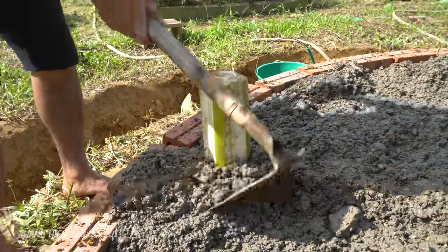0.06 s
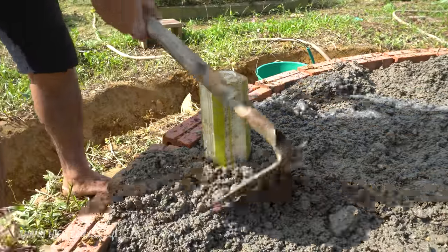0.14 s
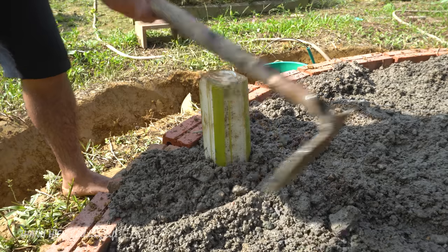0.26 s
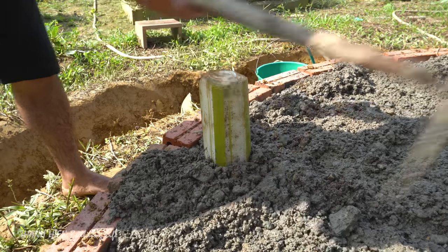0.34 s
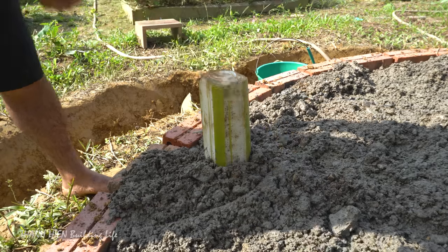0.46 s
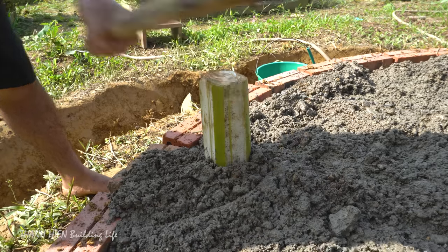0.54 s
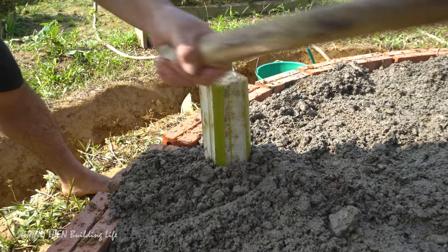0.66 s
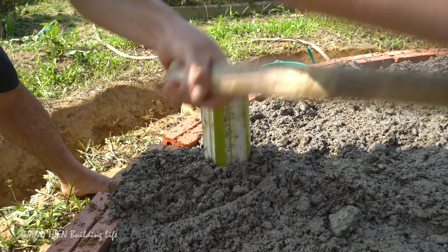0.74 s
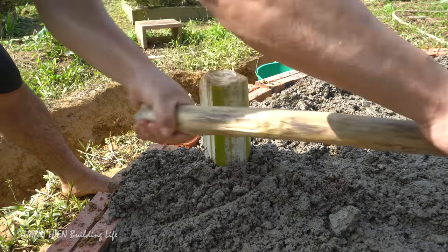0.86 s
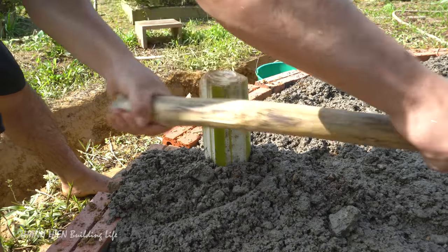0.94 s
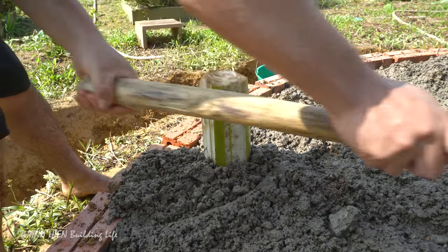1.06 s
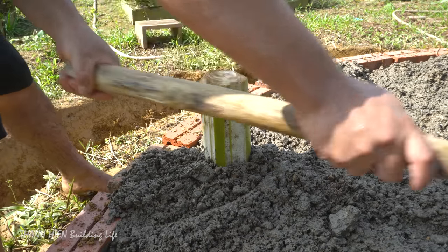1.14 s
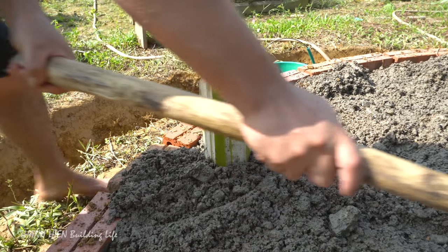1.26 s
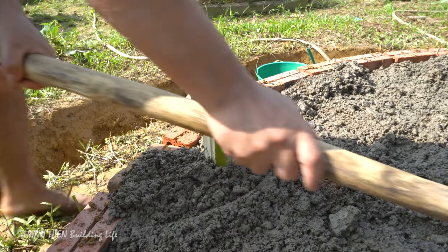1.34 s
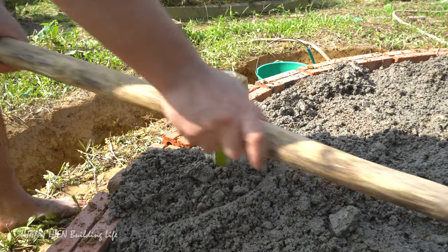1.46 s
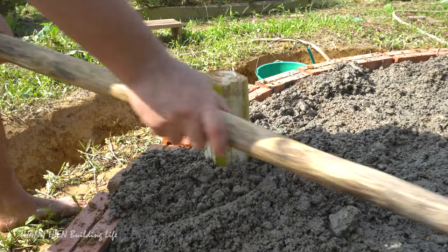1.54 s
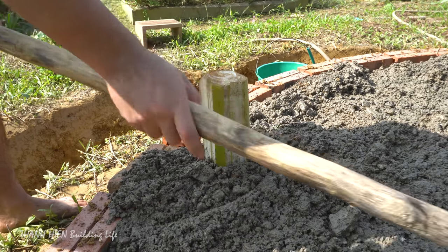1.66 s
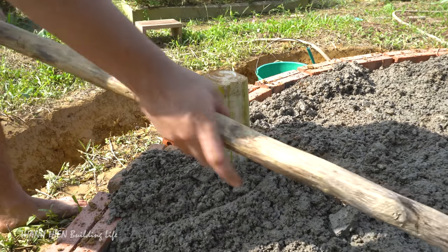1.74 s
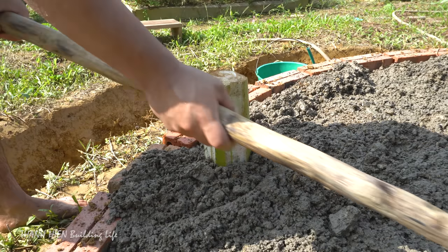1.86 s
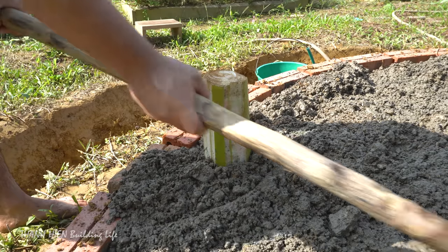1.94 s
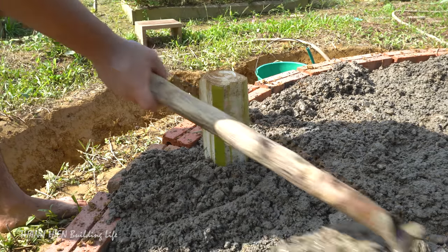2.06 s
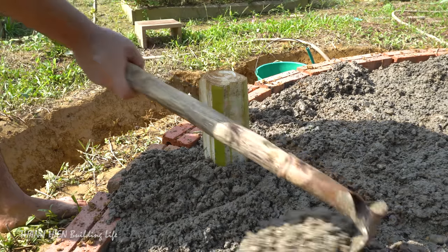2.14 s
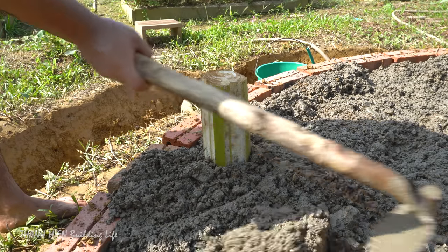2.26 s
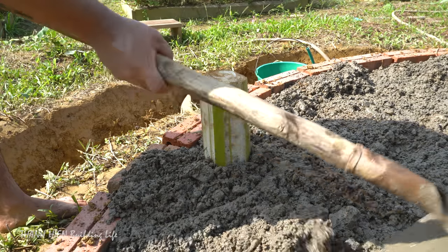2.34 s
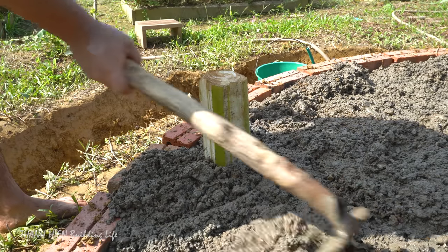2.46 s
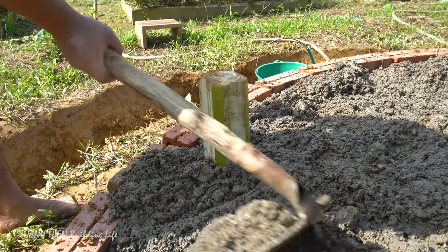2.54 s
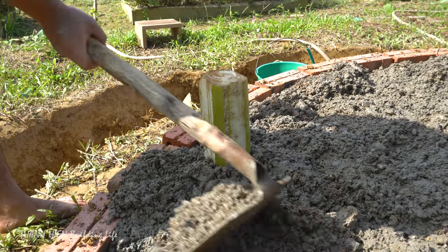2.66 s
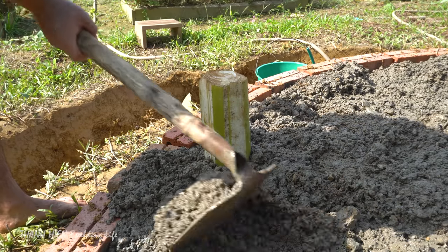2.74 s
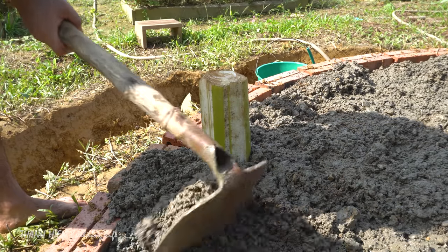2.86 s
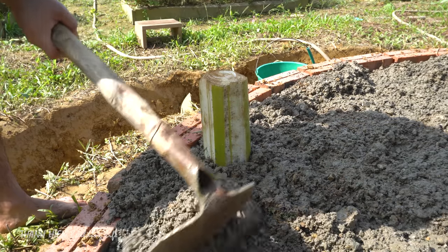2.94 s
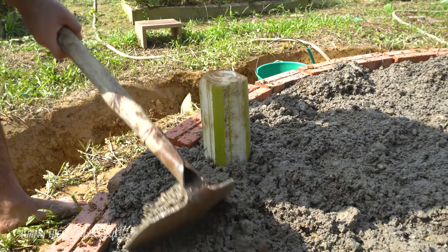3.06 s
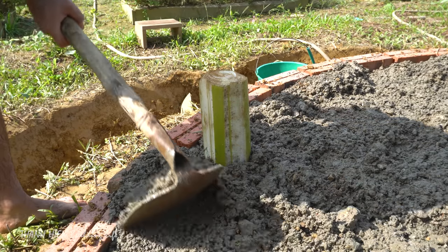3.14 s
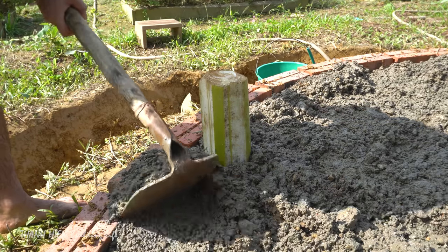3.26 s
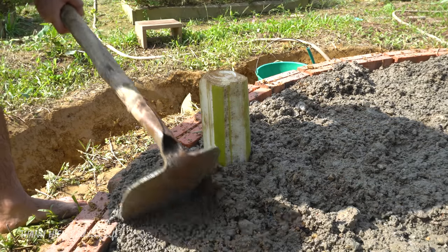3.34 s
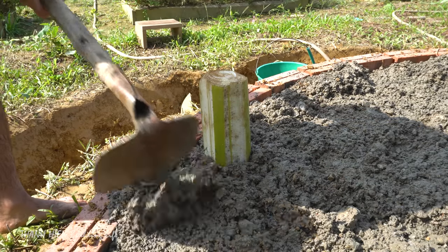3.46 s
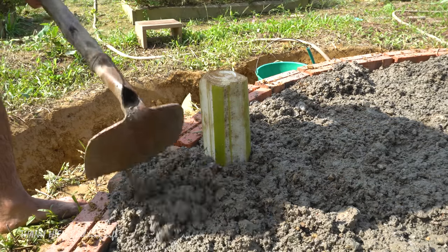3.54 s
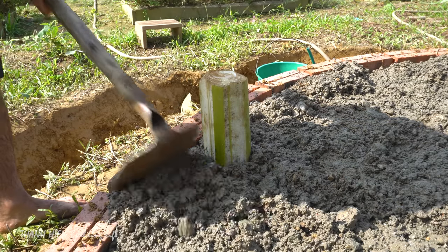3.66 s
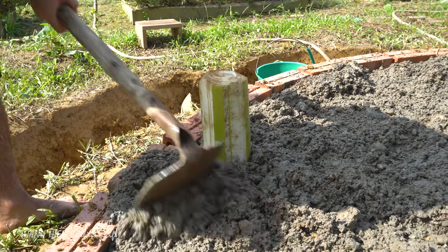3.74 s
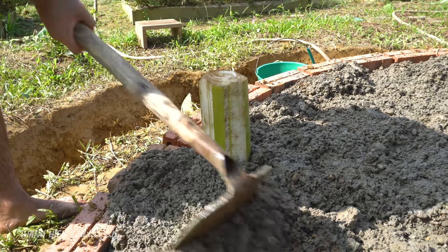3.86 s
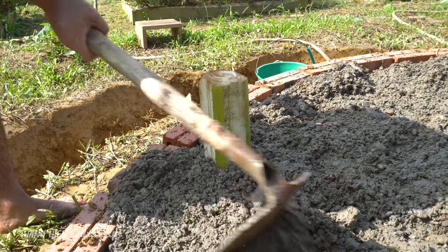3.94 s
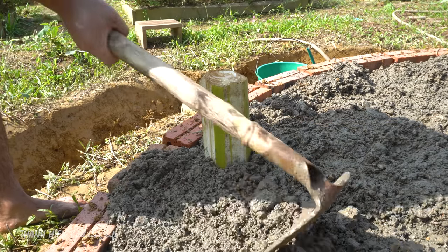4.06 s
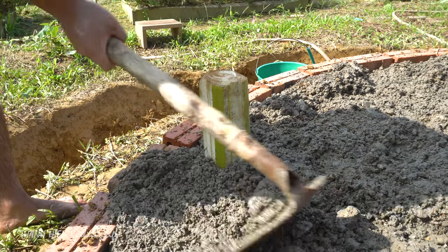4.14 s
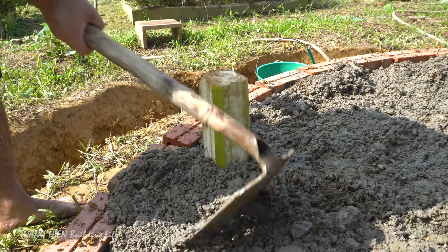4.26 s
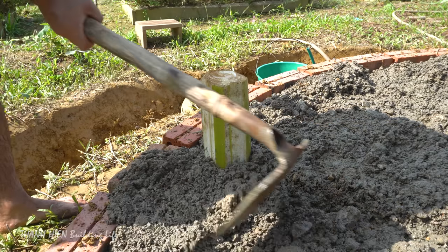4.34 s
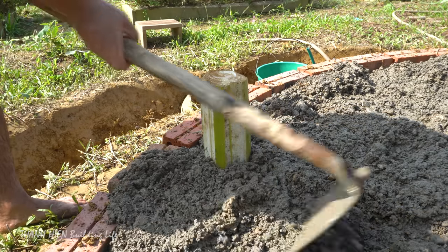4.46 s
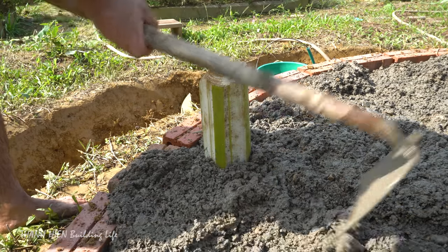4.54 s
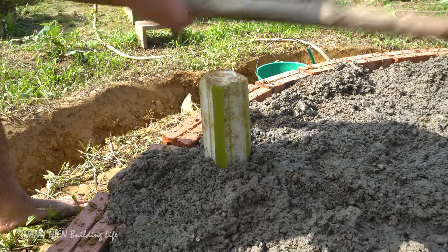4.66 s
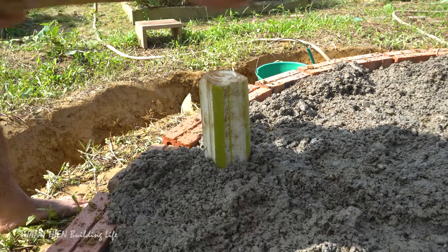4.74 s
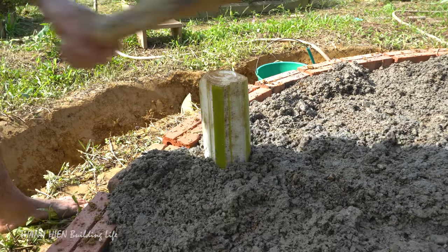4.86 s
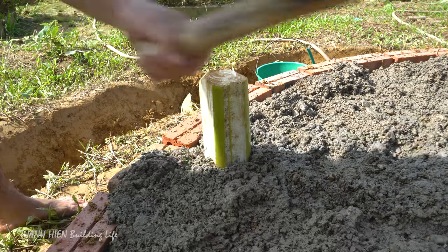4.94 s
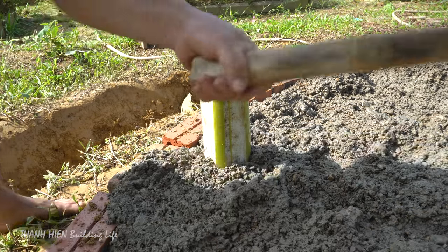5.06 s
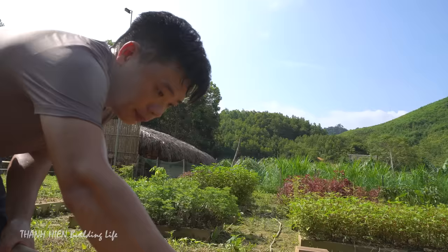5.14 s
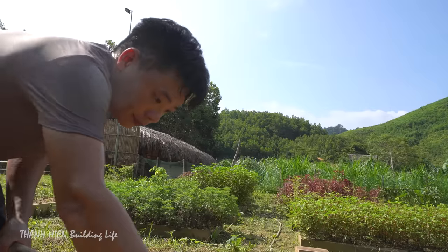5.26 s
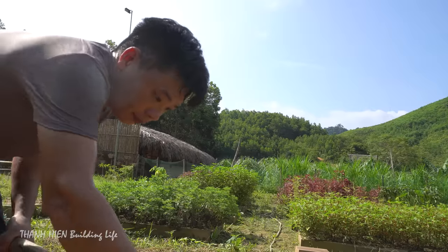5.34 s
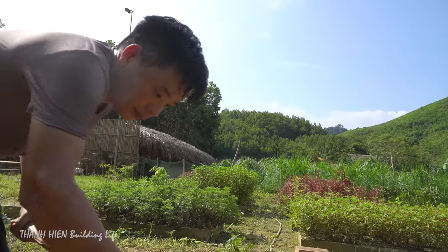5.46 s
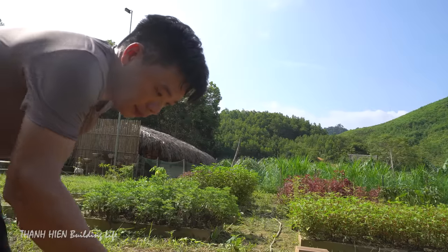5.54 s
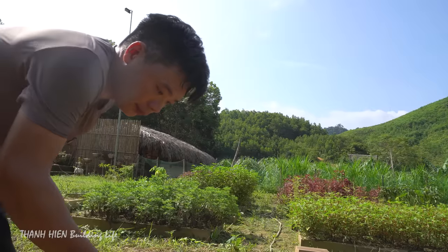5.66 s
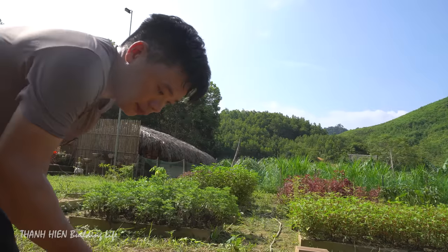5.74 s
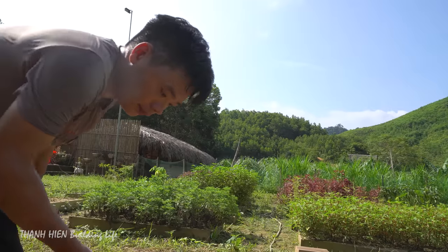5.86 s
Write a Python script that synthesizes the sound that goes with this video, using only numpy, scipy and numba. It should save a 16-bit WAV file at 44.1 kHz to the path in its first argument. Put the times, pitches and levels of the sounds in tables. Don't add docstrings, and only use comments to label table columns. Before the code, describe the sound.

A close stereo microphone outdoors hears a steel hoe working coarse, damp sand and cement. At 0.1 s comes a short bright crunch with stone clicks, gone by about 0.3 s. In the pause, palms rub the wooden handle, a distant cockerel crows and a faint bird whistles. At 0.8 s a hard chop starts a loud grinding drag until 1.45 s, the blade ringing metallically and stones cracking. Softer gritty sliding and lumps follow around 1.6 to 2.3 s. Another sharp bite lands at 2.5 s, trickling after it; a dense scrape runs 3.0 to 3.45 s, a chop falls at 3.75 s, and ringing scrapes come near 4.2 and 4.5 s. From 4.6 s only light ticks and hand slips remain until a violent chop at 5.16 s, then crumbly, thudding dragging to the end. Cicadas drone high throughout, over leaf noise, a low motor hum and breeze rumble.

```python
import sys
import numpy as np
from scipy import signal
from scipy.fft import rfft, irfft
from scipy.io import wavfile
from scipy.ndimage import uniform_filter1d, map_coordinates
from numba import njit

SR = 44100
rng = np.random.default_rng(int(sys.argv[2]) if len(sys.argv) > 2 else 0)


def store_pcm(level_fs):
    pcm = np.round(np.clip(level_fs, -1, 1) * 32767).astype(np.int16)
    wavfile.write(sys.argv[1], SR, np.atleast_2d(pcm).T)


def level_to_linear(level):
    exponent = np.asarray(level, float) / 20
    return 10 ** exponent


N = 259749

# start t/s, crunch level/dB, hold/s, release/(dB per
# s), deep grain level/dB
BITES = [(.1005, -22, .038, 1400, -12), (.110, -21, .002, 900, -12), (.125, -21, .003, 900, -12),
         (.144, -37, .01, 300, -14), (.170, -33, .013, 1200, -12), (.186, -38, .006, 700, -12),
         (.198, -46.5, .036, 800, -22), (.808, -16, .026, 380, -10), (.872, -21, .05, 400, -16),
         (1.163, -20, .03, 300, -2), (1.286, -23, .035, 90, 0), (1.398, -27, .022, 500, -14),
         (2.505, -18.5, .01, 200, -7), (2.983, -33, .03, 300, -30), (3.756, -21.5, .15, 95, -11),
         (4.29, -42, .03, 70, -25), (4.502, -20.5, .034, 300, -34), (4.552, -27, .012, 2000, -30),
         (4.6, -48.5, .06, 80, -35), (5.1585, -15.5, .011, 700, -13), (5.24, -35, .005, 300, -10)]
# peak t/s, level/dB, 10 dB rise/s, 10 dB fall/s, deep grain level/dB
DRAGS = [(.985, -26, .05, .03, -8), (.945, -28, .03, .02, -6), (1.008, -19.5, .018, .04, -14),
         (1.042, -19, .03, .016, -14), (1.085, -19, .022, .04, -15), (1.122, -19.5, .04, .03, -15),
         (1.148, -19.5, .02, .014, -15), (2.53, -19, .012, .025, -7), (2.555, -18.5, .015, .03, -7),
         (2.577, -23, .015, .015, -7), (1.23, -25.5, .04, .17, 2), (1.66, -29, .4, .15, -8),
         (2.08, -26, .21, .17, 3), (2.23, -29.5, .06, .09, -4), (2.38, -37, .08, .1, -30),
         (2.64, -25, .06, .18, 5), (2.9, -29.5, .15, .04, -8), (2.95, -37, .05, .07, -20),
         (3.082, -20, .035, .015, -13), (3.113, -19, .025, .03, -13), (3.146, -17.5, .014, .012, -6),
         (3.17, -26, .03, .06, -6), (3.222, -20.5, .022, .055, -2), (3.41, -23, .062, .062, 2),
         (3.6, -37.5, .16, .11, -45), (3.743, -24, .008, .02, 0), (3.756, -16, .01, .014, -15),
         (4.08, -34, .12, .07, -25), (4.234, -17, .03, .04, -45), (5.195, -19.5, .02, .004, -9),
         (5.31, -29.5, .2, .15, 4), (5.43, -33, .06, .06, 14), (5.54, -31.5, .09, .13, 4),
         (5.66, -32, .09, .07, 8), (5.76, -32.5, .05, .06, 8), (5.86, -30.5, .1, .2, 4)]
# from t/s, to t/s
LIFTED = [
    (.3, .808),
    (4.72, 5.158),
]
# t/s, left port delay/us, fine grain level/dB
BLADE_PATH = [(.1, 6.9, -8), (.13, 6.9, -9.5), (.185, 11, -15), (.84, 51.3, -7), (.875, 50, -17),
              (.91, 49, -11), (.95, 48, -11), (1.14, 46, -7), (1.17, 46, -14), (1.2, 45, -9),
              (1.29, 44, -14), (1.33, 43, -10), (1.9, 30, -9.5), (2.3, 7, -7.5), (2.55, 15, -7),
              (2.8, 3.7, -10.5), (3.1, 1.6, -4), (3.27, 1.6, -10), (3.68, 1.7, -5), (3.95, 5, -9),
              (4.18, 11, -4), (4.5, 18, -7), (5.15, 65, -7.5), (5.25, 18, -10), (5.5, 8, -5.5),
              (5.8, 1, -6)]
# f/Hz, density level/dB per Hz
GRIT_COLOUR = [(71, -56), (120, -43), (418, -38), (712, -11.5), (1090, -3.5), (1340, -3.5), (1620, -3),
               (2640, -1.5), (8480, -5), (13300, -16.5), (16000, -35)]
# from t/s, to t/s, f/Hz, width/Hz, level/dB
BLADE_RINGS = [(.1, .15, 1950, 250, 2), (.15, 0.254, 1950, 200, 8.5), (0.796, 1.234, 1324, 120, 4),
               (.8, 1.165, 1990, 150, -3.5), (.9, 1.298, 2560, 100, -4), (.98, 1.16, 720, 80, 1),
               (1.25, 1.436, 1380, 100, -0.5), (2.49, 2.564, 2500, 150, 0), (3.035, 3.235, 1950, 250, -8),
               (3.74, 3.946, 2440, 250, -22), (2.896, 2.93, 2250, 200, 4), (2.984, 3.025, 2370, 100, 10),
               (4.575, 4.61, 3600, 120, 8), (1.24, 1.32, 2400, 150, 2), (3.974, 4.155, 950, 40, 8),
               (4.17, 4.29, 936, 45, 10.5), (4.572, 4.603, 950, 90, 2), (4.574, 4.605, 1470, 80, 10),
               (4.51, 4.525, 1900, 300, 3), (5.238, 5.275, 1230, 120, 1), (5.15, 5.21, 1900, 120, -6),
               (5.15, 5.21, 3080, 200, -11), (5.65, 5.774, 780, 100, -18)]
# t/s, peak level/dB, ring f/Hz, ring t60/s, crack level/dB
STONES = [(0.111, 10, 1800, 0.015, -18), (0.128, 6, 3000, 0.015, -16), (0.234, -17, 2470, 0.06, -30),
          (0.81, -24, 1270, 0.012, -17), (1.045, 2, 1350, 0.02, -12), (1.197, 4, 1280, 0.022, -17),
          (2.553, -24, 1360, 0.015, -12), (3.094, -2, 1930, 0.015, -9), (3.142, -6.5, 1970, 0.018, 0.5),
          (3.257, -14, 3320, 0.015, -16), (3.405, 1, 1850, 0.018, -13), (3.751, -6, 2150, 0.039, -20),
          (4.182, -17, 910, 0.015, -8), (4.229, -15, 4500, 0.017, -21), (4.249, 8, 4060, 0.015, -23),
          (4.519, 7, 930, .025, -40), (4.52, 2, 580, .05, -40), (4.564, -6, 950, .03, -30),
          (4.564, -5, 1490, .03, -30), (4.717, -24, 990, 0.05, -40), (5.162, 9, 2980, 0.017, -18),
          (5.172, -0.5, 3100, 0.022, -15), (5.192, -5, 1300, 0.015, -7), (5.264, -8, 1230, 0.024, -12),
          (5.669, -12, 743, 0.015, -14)]
# t/s, peak level/dB, ring f/Hz, brightness level/dB
TICKS = [(.1118, -2, 2760, -24), (0.183, -2, 1890, -30), (0.6245, -32, 2900, -14), (1.867, -20, 3590, -16),
         (3.614, -21, 2630, -16), (0.8733, 2.5, 1700, -24), (0.9615, 2.5, 2640, -20),
         (0.964, -6, 2200, -24), (1.4205, -8, 2900, -24), (2.5062, 3, 2330, -9), (2.625, -8, 1900, -17),
         (2.664, -17, 9500, -10), (2.9072, -6, 2200, -22), (2.912, -13, 2150, -28),
         (2.9865, -16, 2370, -14), (3.0406, 4, 2330, -5), (3.1755, -8, 1890, -14), (3.609, -14, 2900, -11),
         (3.93, -6, 3940, -16), (4.142, -17, 5000, -16), (4.1515, -8, 3540, -14), (4.439, -33, 4730, -13),
         (4.505, -8, 2390, -15), (4.5205, 1, 926, -18), (5.074, -33, 4770, -13), (5.091, -32, 4620, -14),
         (4.1545, -15, 3540, -14), (3.0955, -3, 2900, -16), (3.301, -21, 3000, -14),
         (1.0465, -6, 3000, -14)]
# t/s, peak level/dB, f/Hz
ROLLING_STONES = [(0.109, -12, 1870), (0.11, -19, 1060), (0.111, -13, 2760), (0.114, -14, 3550),
                  (0.126, -12, 1920), (0.127, -15, 3360), (0.822, -13, 1270), (0.903, -16, 1340),
                  (0.913, -21, 4670), (0.919, -17, 1310), (1.079, -20, 4520), (1.083, -16, 2690),
                  (1.096, -13, 1380), (1.124, -17, 1340), (1.129, -19, 3550), (1.139, -15, 1250),
                  (1.266, -20, 2370), (1.306, -21, 2480), (1.312, -19, 1440), (1.344, -21, 1790),
                  (1.377, -22, 1460), (2.517, -19, 860), (2.517, -16, 4690), (2.624, -21, 3060),
                  (2.996, -25, 2370), (3.075, -20, 1980), (3.08, -17, 4950), (3.096, -15, 1920),
                  (3.113, -19, 1870), (3.212, -21, 900), (3.402, -20, 1830), (3.403, -22, 3010),
                  (3.403, -21, 2220), (3.751, -18, 3060), (3.752, -15, 3550), (3.754, -18, 4330),
                  (3.754, -13, 2200), (3.825, -19, 3510), (4.024, -29, 1030), (4.088, -30, 2820),
                  (4.198, -30, 930), (4.231, -21, 1870), (4.232, -18, 3550), (4.265, -21, 930),
                  (4.504, -20, 3040), (4.504, -19, 3940), (4.505, -21, 1420), (4.505, -20, 5000),
                  (4.505, -12, 2390), (4.535, -17, 880), (4.535, -17, 4390), (4.54, -18, 1460),
                  (5.164, -16, 2670), (5.169, -16, 1060), (5.17, -13, 3120), (5.171, -13, 1890),
                  (5.19, -19, 1890), (5.191, -18, 1270), (5.264, -23, 1230), (5.512, -27, 1250)]
# t/s, peak
# level/dB, f/Hz
WET_LUMPS = [(0.113, -21, 580), (0.373, -54, 450), (1.007, -21, 710), (1.073, -25, 730), (1.248, -31, 540),
             (1.305, -27, 520), (2.041, -28, 750), (2.087, -27, 780), (2.196, -34, 470), (2.635, -26, 800),
             (2.737, -31, 820), (3.395, -26, 780), (3.738, -28, 470), (3.86, -30, 390), (4.021, -41, 470),
             (4.117, -44, 540), (4.777, -48, 540), (4.963, -45, 520), (5.019, -51, 520), (5.082, -51, 560),
             (5.387, -34, 300), (5.416, -33, 540), (5.66, -30, 800), (5.75, -34, 800), (5.811, -38, 820),
             (5.881, -37, 450), (.186, -34, 1756), (.874, -23, 1326), (2.908, -28, 2184),
             (2.908, -32, 2376), (2.99, -29, 2380), (4.437, -46, 900), (4.716, -49, 1250),
             (4.826, -52, 710), (5.04, -48, 1410)]
# t/s, peak level/dB
JOLTS = [
    (.812, -40),
    (2.506, -35),
    (3.75, -46),
    (5.162, -35),
]
# t/s, peak level/dB, f/Hz
THUDS = [(.812, -38, 150), (2.1, -36, 280), (2.105, -36, 400), (2.15, -42, 115), (2.02, -42, 310),
         (3.4, -40, 170), (3.75, -33, 230), (5.165, -32, 190), (5.3, -36, 260), (5.36, -33, 330),
         (5.43, -36, 220), (5.5, -34, 300), (5.58, -36, 240), (1.31, -33, 280)]
# from t/s, to t/s, low mode level/dB, upper mode level/dB, rustle level/dB
PALM_SLIPS = [
    (.38, .55, -63, -67, -60),
    (.5, .62, -72, -68, -56),
    (.62, .72, -62, -64, -55),
    (.72, .8, -64, -61, -57),
    (4.62, 4.76, -78, -74, -54),
    (4.77, 4.8, -70, -58, -52),
    (4.8, 4.95, -66, -61, -47),
    (4.95, 5.0, -55, -53, -47),
    (5.0, 5.08, -57, -52, -50),
    (5.08, 5.13, -59, -66, -53),
]
# f/Hz, width/Hz
HANDLE = [
    (530, 50),
    (1400, 80),
    (2700, 5300),
]
# f/Hz, width/Hz
GROUND = (124, 31)
# f/Hz, width/Hz, level/dB, tymbal clicks/(1 per s)
CICADAS = [
    (4850, 500, -54.5, 250),
    (5450, 300, -63, 290),
    (7360, 550, -60, 180),
]
# from t/s, to t/s, levels of partials 1, 2, 3/dB
CROW = [
    (-.05, .09, -67, -64, -68),
    (.27, .47, -74, -63, -77),
    (.45, .62, -63, -70, -76),
    (.64, .72, -64, -62, -63),
    (.72, .81, -64, -57, -60),
]
# from t/s, to t/s, from f/Hz, to f/Hz, level/dB
BIRD = [
    (.47, .65, 2950, 3500, -55),
    (.52, .565, 3800, 2900, -54),
]
# f/Hz, density level/dB per Hz
FIELD_COLOUR = [(59, -34), (100, -17), (302, -8), (524, -11), (634, -7), (1280, -10), (1360, -17),
                (1610, -9.5), (4110, -11.5), (5300, -4.5), (6290, -16.5), (9020, -14.5), (16000, -20)]
# f/Hz, likeness/(0 to 1)
FIELD_ALIKE = [(60, 0.42), (300, .8), (1400, 0.88), (3100, 0.25), (6800, 0.11), (15000, 0.18)]
# f/Hz, width/Hz, level/dB
FAR_MOTOR = (118, 15, -75)
# peak t/s, 10 dB change/s, breeze level/dB, rumble level/dB
GUSTS = [(.85, .05, -53, -54), (1.0, .08, -53, -56), (1.13, .08, -50, -54), (1.36, .1, -56, -55),
         (1.7, .2, -60, -58), (1.9, .1, -58, -66), (2.14, .08, -51, -50), (2.53, .1, -60, -60),
         (2.72, .1, -66, -57), (3.15, .1, -67, -63), (3.82, .1, -60, -64), (4.1, .2, -56, -62),
         (4.28, .1, -55, -62), (4.6, .09, -55, -68), (5.2, .1, -60, -55), (5.42, .25, -55, -57),
         (5.65, .2, -55, -55)]


def hoe():
    t = np.arange(N) / SR
    hits = crunch() + stones()
    out = hits + ticks()
    for t0, t1, hz, width, db in BLADE_RINGS:
        out += level_to_linear(db) * mode(hits * ((t > t0) & (t < t1)), hz, width)
    tail_t = np.arange(4000) / SR
    tail = rng.standard_normal((2, 4000)) * level_to_linear(-60 * tail_t / 0.04)
    out += level_to_linear(-43) * signal.fftconvolve(out, tail, axes=1)[:, :N]
    return high_pass(out, 3, 310)


def crunch(grains=90000, cycles=19.2, scatter_db=1.5, slip_db=1.1, clump_db=1.8, clumps_per_s=45, edge_us=10):
    draw, odd = rng.random((grains, 3)).T, rng.standard_normal(grains)
    s = draw[0] * N / SR
    hz = (12 + 114 * draw[1]) ** 2
    t60 = cycles / hz
    size = level_to_linear(on_log(GRIT_COLOUR, hz) - scatter_db * np.log(draw[2])) * hz ** (3 / 4)
    mid = (hz > 1000) & (hz < 4500)
    steady = pings(s[mid] * SR, 0 * s[mid], hz[mid], t60[mid], size[mid], N)
    size = size / np.sqrt(np.mean(steady ** 2))

    level_db, deep_db, fine_db = work(s)
    deep = np.clip(np.log2(1300 / hz) / 1.6, 0, 1.6)
    fine = np.clip(np.log2(hz / 3500), 0, 1.4)
    gain = level_to_linear(level_db + deep * (deep_db + 16) + fine * (fine_db + 5.5))
    for t0, t1 in LIFTED:
        gain = gain * ((s < t0) | (s > t1))

    slip = level_to_linear(slip_db * walk(120)[(s * SR).astype(int)])
    clumps = rng.standard_normal((int(N / SR * clumps_per_s) + 2, 16))
    patch = map_coordinates(clumps, [s * clumps_per_s, 2 * np.log2(hz / 140)], order=1)
    slip = slip * level_to_linear(clump_db * patch - 0.1)
    lag = lag_at(s) + edge_us * 1e-6 * SR * odd[::-1]
    return pings(s * SR + 4, lag, hz, t60, size * gain * slip * np.sign(odd), N)


def work(s, bite_s=.004, bite_db=36, spray_db=9, spray_s=.025, trickle_fine=.12):
    t = np.arange(0, N / SR + .002, .001)
    parts = []
    for at, db, rise, fall, deep_db in DRAGS:
        parts.append((db + swell(t, at, rise, fall), deep_db, 0 * t))
    for at, db, hold, release, deep_db in BITES:
        attack_db = np.minimum(bite_db * ((t - at) / bite_s - 1), 0)
        decay_db = release * np.maximum(t - at - bite_s - hold, 0)
        spray = spray_db * np.exp(-np.maximum(t - at, 0) / spray_s)
        parts.append((db + attack_db - decay_db, deep_db, spray))
    levels, deeps, fines = zip(*parts)
    power = level_to_linear(2 * np.array(levels)) + 1e-12
    total = power.sum(axis=0)
    level_db = 10 * np.log10(total)
    deep_db = np.array(deeps) @ power / total
    fine_db = (power * np.array(fines)).sum(axis=0) / total
    fine_db = fine_db - trickle_fine * (np.maximum(level_db, -55) + 25)
    when, _, view_db = np.transpose(BLADE_PATH)
    fine_db = fine_db + np.interp(t, when, view_db)
    return [np.interp(s, t, v) for v in (level_db, deep_db, fine_db)]


def stones(crack_s=0.000763):
    s, peak_db, hz, t60, crack_db = np.transpose(STONES)
    ring = pings(s * SR, lag_at(s), hz, t60, level_to_linear(peak_db - 21), N)
    draw = rng.random((len(s), 24, 3))
    at = (s[:, None] - crack_s * np.log(draw[..., 0])).ravel()
    chip_hz = (1200 * 11 ** draw[..., 1]).ravel()
    size = level_to_linear((peak_db + crack_db)[:, None] - 17 * draw[..., 2]).ravel()
    size = size * np.resize([1, -1], at.size)
    return ring + pings(at * SR, lag_at(at), chip_hz, 6 / chip_hz, size, N)


def ticks(chips=40, spread_s=.0006, ring_s=.018):
    out, draw = np.zeros((2, N)), rng.random((len(TICKS), 3, chips))
    for (s, peak_db, ring_hz, bright_db), (late, pitch, turn) in zip(TICKS, draw):
        lowest, first = max(ring_hz * .72, 900), int(s * SR) - 8
        at = np.append(s - spread_s * np.log(late), s)
        chip_hz = lowest * (14000 / lowest) ** ((np.arange(chips) + pitch) / chips)
        hz, t60 = np.append(chip_hz, ring_hz), np.append(7 / chip_hz, ring_s)
        tilt = np.clip(np.log2(chip_hz / 3000), 0, 1.5) / 1.5
        size = np.append(np.sign(turn - .5) * level_to_linear((bright_db + 15) * tilt), 1.4)
        tick = pings(at * SR - first, lag_at(at), hz, t60, size, 2000)
        out[:, first:first + 2000] += tick * level_to_linear(peak_db - 2.5) / np.abs(tick).max()
    return high_pass(out, 2, 520)


def soft_knocks(table, t60_s, soft=2.5):
    s, peak_db, hz = np.transpose(table)
    size, t60 = level_to_linear(peak_db + 8), t60_s + 0 * s
    dying = pings(s * SR, lag_at(s), hz, t60, size, N)
    building = pings(s * SR, lag_at(s), hz, t60 / soft, size, N)
    return dying - building


def jolts(hz=70, t60_s=.012):
    s, peak_db = np.transpose(JOLTS)
    return pings(s * SR, 0 * s, hz + 0 * s, t60_s + 0 * s, level_to_linear(peak_db + 10), N)


def thuds(cycles=14):
    s, peak_db, hz = np.transpose(THUDS)
    return high_pass(pings(s * SR, 0 * s, hz, cycles / hz, level_to_linear(peak_db), N), 2, 110)


def hands():
    rub = rng.standard_normal(N) * level_to_linear(3 * walk(70))
    t, out = np.arange(N) / SR, 0
    for k, (hz, width) in enumerate(HANDLE):
        gain = sum(level_to_linear(dbs[k]) * held(t, t0, t1) for t0, t1, *dbs in PALM_SLIPS)
        out = out + gain * unit(mode(mode(rub, hz, width), hz, 4 * width))
    return out


def rumble():
    return gusts(1, -74) * unit(mode(rng.standard_normal(N), *GROUND))


def cicadas():
    out = 0
    for hz, width, db, rate in CICADAS:
        click_hz = rate * (1 + 0.047 * walk(15))
        beat = 1 + .5 * np.sin(2 * np.pi * np.cumsum(click_hz) / SR)
        shared, own = rng.standard_normal(N), rng.standard_normal((2, N))
        chorus = mode(mode((shared + 1.2 * own) * beat, hz, width), hz, width * 2)
        out = out + level_to_linear(db + walk(10)) * unit(chorus)
    return out


def crow(note_hz=702):
    t, out = np.arange(N) / SR, 0
    phase = 2 * np.pi * np.cumsum(note_hz * (1 + 0.002 * walk(31.6))) / SR
    gains = sum(level_to_linear(np.array(dbs))[:, None] * held(t, t0, t1) for t0, t1, *dbs in CROW)
    for k, gain in enumerate(gains):
        out = out + np.sqrt(2) * gain * level_to_linear(2 * walk(27)) * np.sin((k + 1) * phase)
    return out


def bird():
    t, out = np.arange(N) / SR, 0
    for t0, t1, hz0, hz1, db in BIRD:
        arch = np.sin(np.pi * np.clip((t - t0) / (t1 - t0), 0, 1))
        phase = 2 * np.pi * np.cumsum(np.interp(t, [t0, t1], [hz0, hz1])) / SR
        out = out + level_to_linear(db + 4 * walk(60)) * arch * np.sin(phase)
    return out


def field(level_db=-51.5):
    hz = np.arange(N // 2 + 1) * SR / N
    alike = np.clip(on_log(FIELD_ALIKE, hz), 0, 1)
    mid, side = (rfft(rng.standard_normal(N)) * level_to_linear(on_log(FIELD_COLOUR, hz)) for _ in range(2))
    opposed = np.array([[1], [-1]])
    both = irfft(mid * np.sqrt(1 + alike) + side * np.sqrt(1 - alike) * opposed, N)
    return level_to_linear(level_db + 1.5 * walk(4)) * unit(both)


def breeze():
    own = mode(mode(rng.standard_normal((2, N)), 26, 18), 26, 30)
    puff = rng.standard_normal(N) + 2.2 * own
    band = signal.butter(2, [25, 80], "band", fs=SR, output="sos")
    return gusts(0, -70) * unit(signal.sosfilt(band, puff))


def far_motor():
    hz, width, db = FAR_MOTOR
    return level_to_linear(db) * unit(mode(rng.standard_normal(N), hz, width))


def gusts(column, calm_db):
    t = np.arange(0, N / SR + .02, .01)
    power = level_to_linear(2 * calm_db) + sum(level_to_linear(2 * (dbs[column] + swell(t, at, span, span))) for at, span, *dbs in GUSTS)
    return np.interp(np.arange(N) / SR, t, np.sqrt(power))


def swell(t, peak_s, rise_s, fall_s, bend=1.4):
    return -10 * np.where(t < peak_s, (peak_s - t) / rise_s, (t - peak_s) / fall_s) ** bend


def held(t, t0, t1, fade_s=.025):
    return np.clip(np.minimum(t - t0, t1 - t) / fade_s + .5, 0, 1)


def lag_at(s):
    when, late_us, _ = np.transpose(BLADE_PATH)
    return np.interp(s, when, late_us) * 1e-6 * SR


@njit
def pings(start, lag, hz, t60, size, n):
    out = np.zeros((2, n))
    for k in range(len(start)):
        pole = (2j * np.pi * hz[k] - np.log(1000.) / t60[k]) / SR
        step = np.exp(pole)
        for c in range(2):
            at = start[k] + lag[k] * (.5 - c)
            i = int(at) + 1
            z = size[k] * np.exp(pole * (i - at))
            for j in range(i, min(n, i + int(t60[k] * SR * .7))):
                out[c, j] += z.imag
                z *= step
    return out


def mode(x, hz, width):
    return signal.lfilter(*signal.iirpeak(hz, hz / width, fs=SR), x)


def high_pass(x, order, hz):
    return signal.sosfilt(signal.butter(order, hz, "high", fs=SR, output="sos"), x)


def walk(rate):
    k = int(SR / rate)
    return uniform_filter1d(np.repeat(rng.standard_normal(N // k + 1), k), k)[:N]


def unit(x):
    return x / np.sqrt(np.mean(x ** 2))


def on_log(table, hz):
    f, v = np.transpose(table)
    return np.interp(np.log(np.maximum(hz, 1)), np.log(f), v)


def scene():
    blows = soft_knocks(ROLLING_STONES, .03) + soft_knocks(WET_LUMPS, .08) + jolts() + thuds()
    work_sounds = hoe() + blows + hands() + rumble()
    return work_sounds + cicadas() + crow() + bird() + field() + breeze() + far_motor()


def band_limit(x):
    return signal.sosfilt(signal.butter(12, 16000, fs=SR, output="sos"), x)


def record(dry):
    top_cut = signal.ellip(8, .2, 60, 15750, fs=SR, output="sos")
    mix = np.clip(signal.sosfilt(top_cut, dry), -1, 1)
    return band_limit(mix)


dry = scene()
out = record(dry)
store_pcm(out)
```